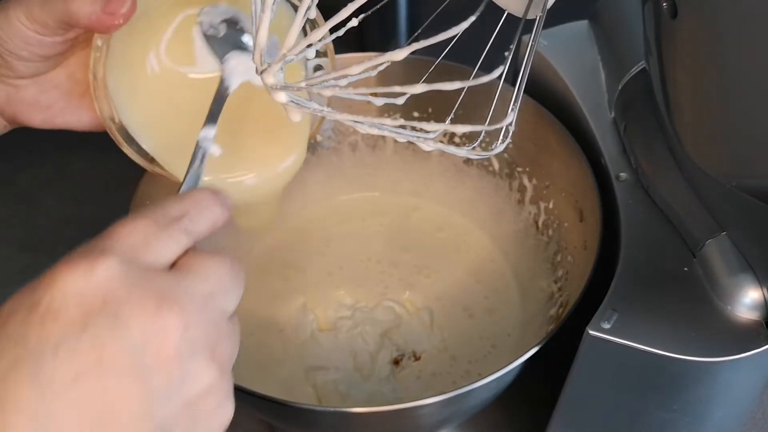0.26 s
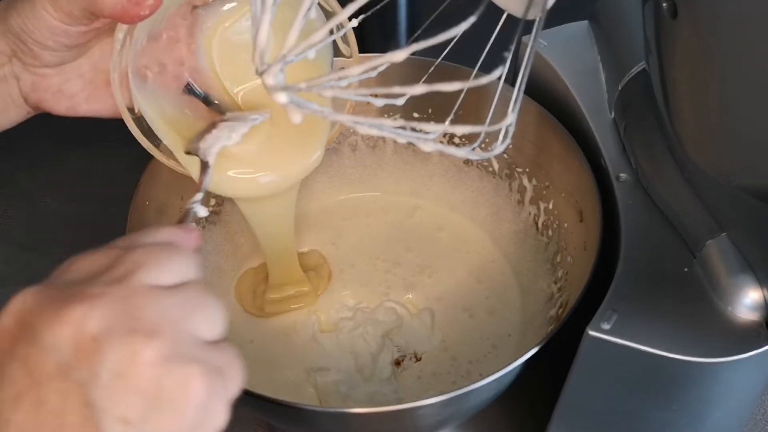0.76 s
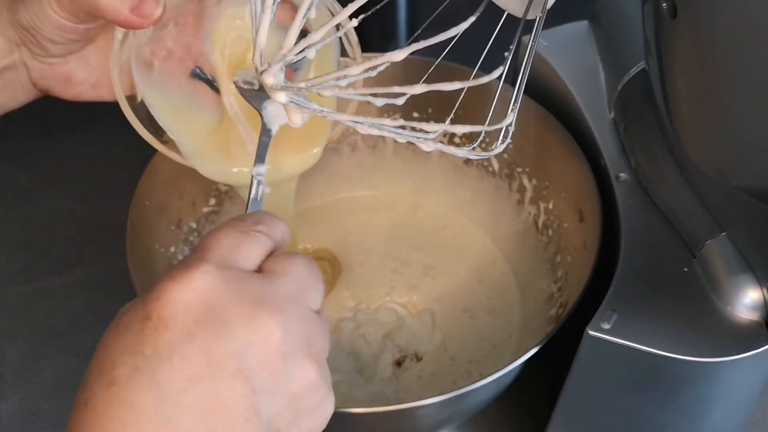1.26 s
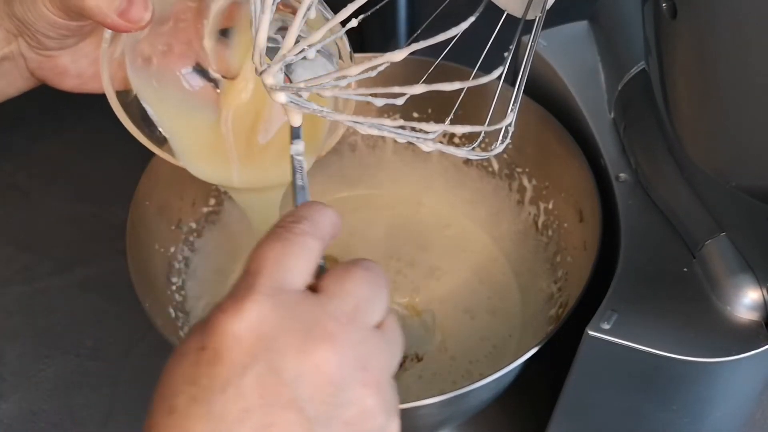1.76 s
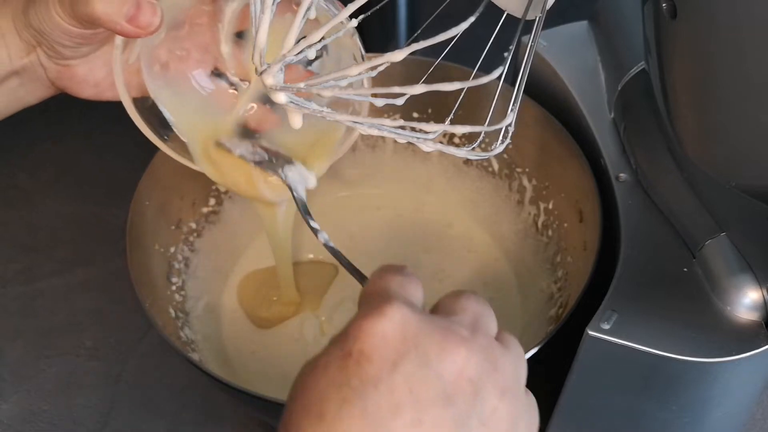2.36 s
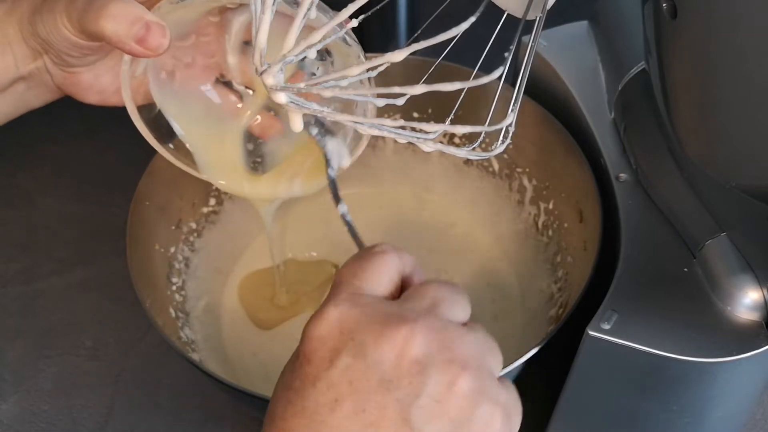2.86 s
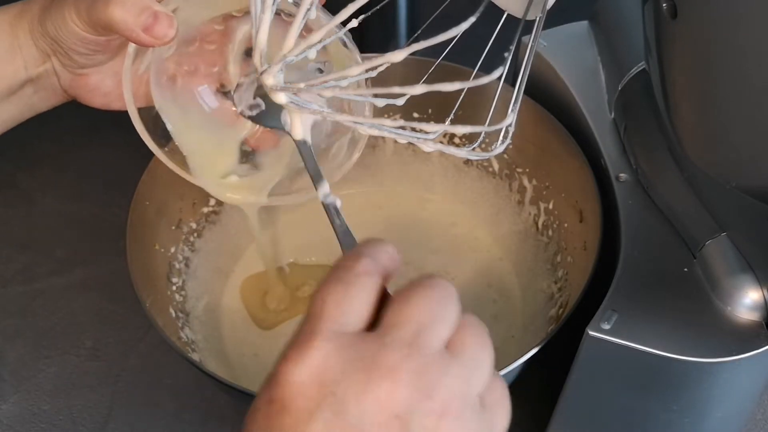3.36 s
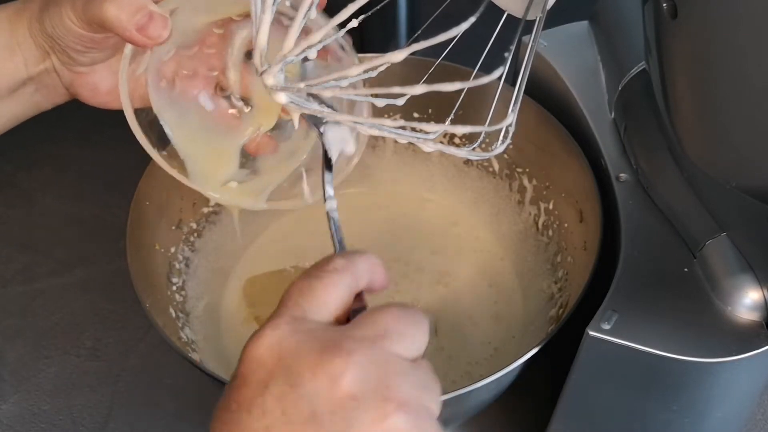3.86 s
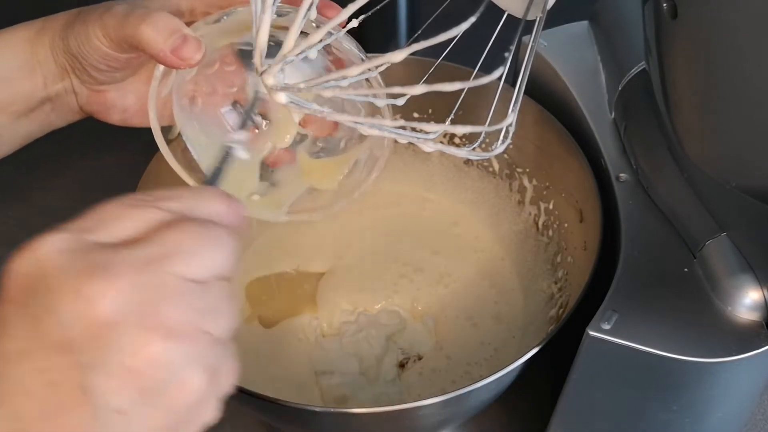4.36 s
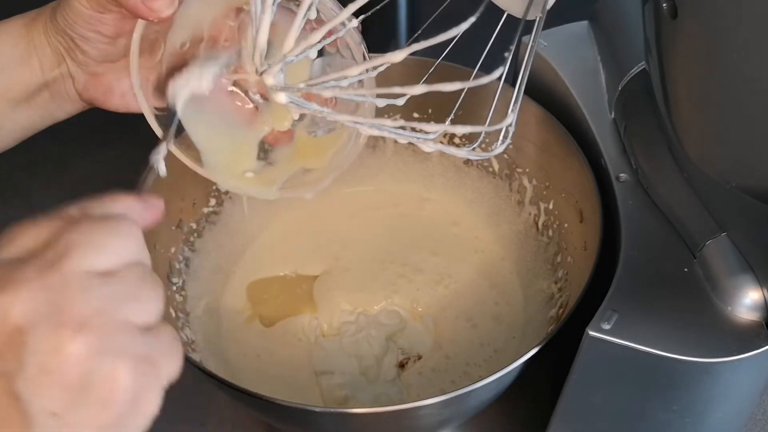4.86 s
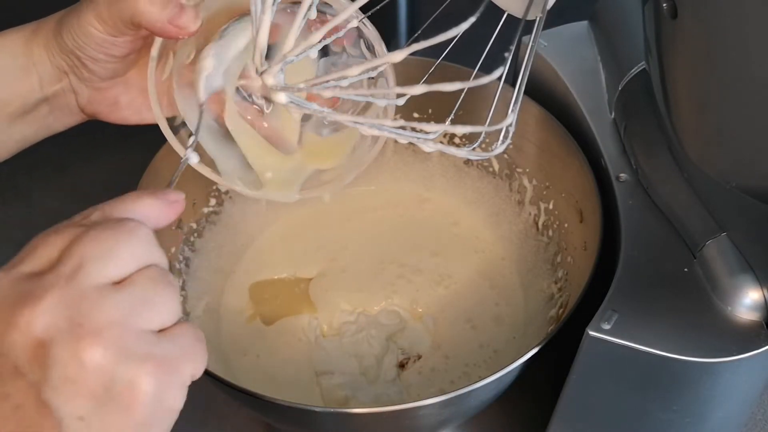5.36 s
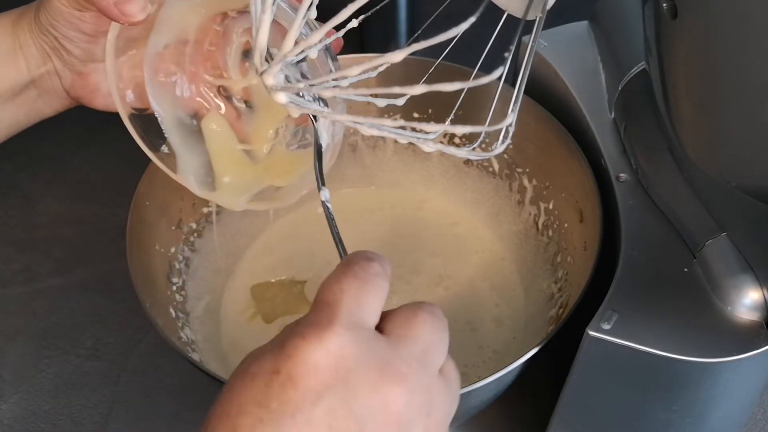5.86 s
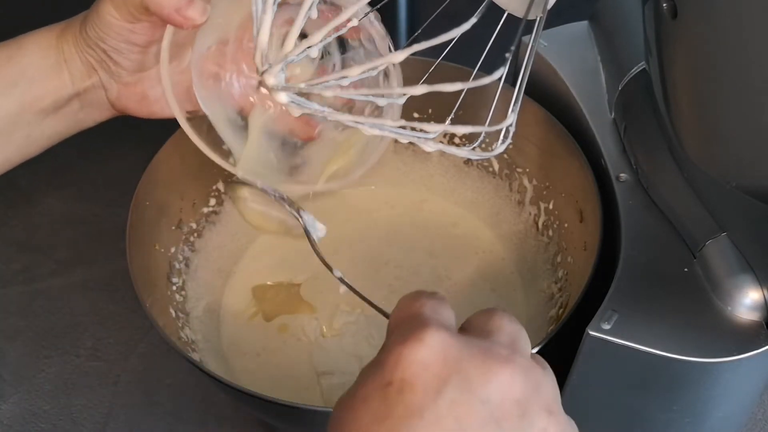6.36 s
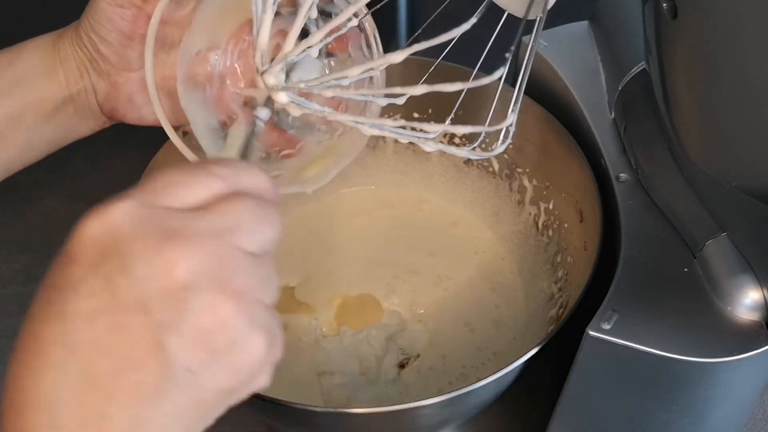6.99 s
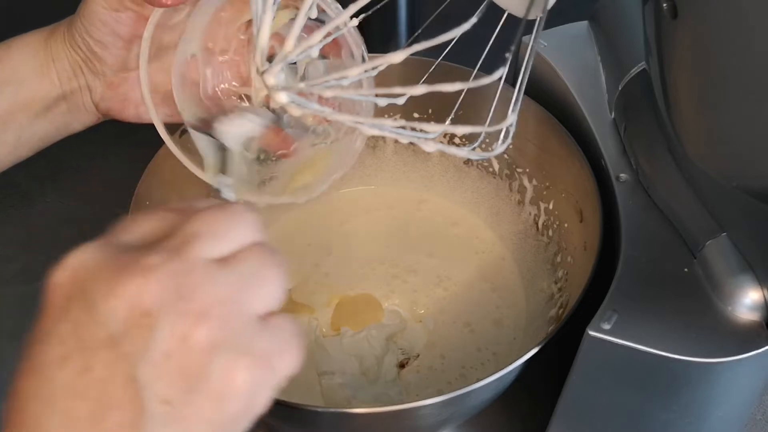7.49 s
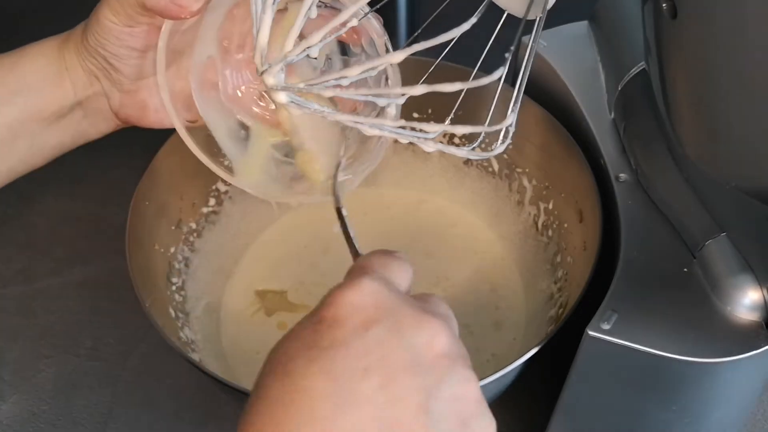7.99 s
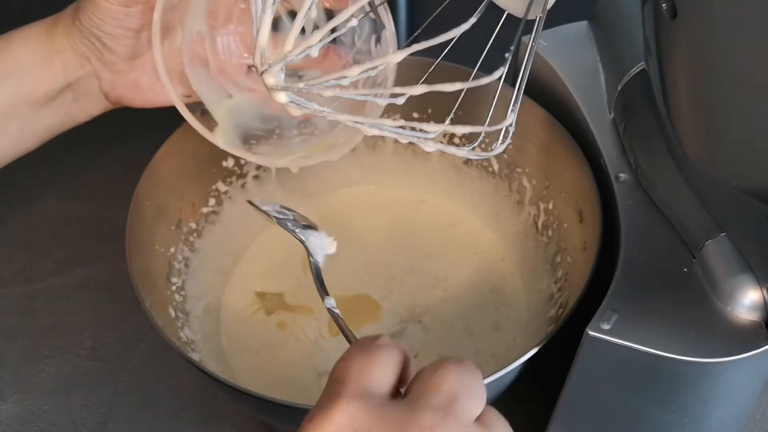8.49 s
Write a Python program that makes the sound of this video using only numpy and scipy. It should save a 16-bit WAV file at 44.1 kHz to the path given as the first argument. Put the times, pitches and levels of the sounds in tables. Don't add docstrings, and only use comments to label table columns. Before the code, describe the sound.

Steel fork strokes scrape thick syrup from a glass bowl, each landing with a bright short clink, with quiet appliance hum behind.

```python
import sys
import numpy as np
from scipy import signal
from scipy.fft import rfft, irfft, next_fast_len
from scipy.io import wavfile
from scipy.ndimage import uniform_filter1d, map_coordinates

SR = 44100
rng = np.random.default_rng(int(sys.argv[2]) if len(sys.argv) > 2 else 0)


def dump_mix(stems):
    frames = np.atleast_2d(stems).T
    limited = np.clip(frames, -1, 1)
    pcm = np.round(limited * 32767).astype(np.int16)
    wavfile.write(sys.argv[1], SR, pcm)


def undo_db(level):
    steps = np.asarray(level, float) / 20
    return 10 ** steps


N = 385196


def unit(x):
    return x / np.sqrt(np.mean(x ** 2) + 1e-20)


def along(points, hz):
    f, v = np.transpose(points)
    return np.interp(np.log(hz + 1), np.log(f + 1), v)


def curves(rows):
    s, *cols = np.transpose(rows)
    return [np.interp(np.arange(N) / SR, s, c, left=-150, right=-150) for c in cols]


def filtered(x, response):
    m = next_fast_len(x.shape[-1] + 8192)
    spectrum = rfft(x, m) * response(np.fft.rfftfreq(m, 1 / SR))
    return irfft(spectrum, m)[..., :x.shape[-1]]


def ring(modes, t, scatter_db):
    hz, t60, db = np.transpose(modes)[:, :, None]
    chance = rng.standard_normal((2, len(modes), 2))
    phase = 0.75 * chance[..., :1] * hz / 3000
    level = undo_db(db + scatter_db * chance[..., 1:] - 60 * t / t60)
    rise = 1 - np.exp(-t / 0.00041)
    return rise * np.sum(level * np.sin(2 * np.pi * hz * t + phase), 1)


def decays(peaks, spread):
    return [(hz * (1 + spread * rng.standard_normal()), np.log(1000) / np.pi / width, db)
            for hz, width, db in peaks]


# frequency in Hz, level in dB per Hz.
AIR = [(20, 0.5), (45, -10.5), (101, -14.5), (146, -18.5), (200, -21.5), (300, -28), (420, -26), (600, -31),
       (800, -29.5), (1200, -31.5), (1900, -30), (4200, -38.5), (10000, -45.5), (16000, -47.5)]
# frequency in Hz, left-right likeness (1 is the same).
ALIKE = [(60, 1), (180, 0.88), (350, -0.14), (600, -0.58), (2000, 0.066), (15000, 0.2)]
# frequency in Hz, wander in Hz, peak in dB.
HUM = [(60, .7, 2), (80, .8, 1), (98.9, .2, 2), (197.8, .4, -12)]
# time in seconds, rumble in dB, motor in dB.
LOAD = [(0, -76, -69.5), (2.5, -70.5, -69.5), (2.87, -66.5, -74), (3.33, -70.5, -64), (3.77, -69.5, -75.5),
        (4.33, -64.5, -69.5), (5.2, -62, -70.5), (5.9, -66.5, -70.5), (7.73, -66.5, -69.5),
        (8.74, -76, -72)]
# time in seconds, firing pitch in Hz, level in dB.
ENGINE = [(0, 123.7, -94), (4, 127.8, -80.5), (6, 134.6, -69), (7.7, 141, -70), (8.74, 143.1, -76)]


def background():
    def floor(hz):
        turn = np.arccos(np.clip(along(ALIKE, hz), -1, 1)) / 2
        colour = undo_db(along(AIR, hz)) * (hz < 15750)
        return colour * [np.cos(turn), np.sin(turn)]

    def wander():
        return unit(filtered(rng.standard_normal(N), lambda hz: 1 / (1 + (hz / 4) ** 2)))

    def turns(hz, drift_hz):
        return 2 * np.pi * np.cumsum(hz + drift_hz * wander()) / SR

    mid, side = filtered(rng.standard_normal((2, N)), floor)
    air = undo_db(-61.5) * unit(np.array([mid + side, mid - side]))
    low, idle, motor, octave = [undo_db(db + 3.3 * wander()) * np.sin(turns(hz, drift_hz))
                                for hz, drift_hz, db in HUM]
    rumble_db, motor_db = curves(LOAD)
    engine_hz, engine_db = curves(ENGINE)
    crank = turns(engine_hz, drift_hz=1.7)
    firing = 1.2 * np.sin(crank) + undo_db(-12) * np.sin(2 * crank)
    engine = undo_db(3.0 * wander()) * firing + idle
    return air + undo_db(rumble_db) * low + undo_db(motor_db) * (motor + octave) + undo_db(engine_db) * engine


# frequency in Hz, t60 in seconds.
KITCHEN = [(300, 0.72), (1200, 0.53), (2500, 0.61), (5000, 0.56), (10000, 0.31), (15000, 0.54)]


def kitchen(x):
    out, step = np.zeros((2, N + 2 * SR)), SR // 3
    for start in range(0, N, step):
        hz, t, z = signal.stft(rng.standard_normal((2, SR * 3 // 4)), SR, nperseg=256)
        fade = undo_db(-60 * t / along(KITCHEN, hz)[:, None])
        tail = signal.istft(z * fade, SR, nperseg=256)[1]
        tail *= 1 - np.exp(-np.arange(tail.shape[1]) / SR / 0.0021)
        wet = signal.fftconvolve(x[:, start:start + step], tail / np.linalg.norm(tail[0]), axes=1)
        out[:, start:][:, :wet.shape[1]] += wet
    return out[:, :N]


# frequency in Hz, width in Hz, level in dB.
THUD = [(321.5, 24, -3.5), (410, 120, 6.5), (822, 47, -2.5)]
# time in seconds, level in dB.
BUMPS = [(1.879, -61.5), (4.498, -69), (5.94, -61), (6.088, -61), (7.69, -59)]


def bumps():
    out, t = np.zeros((2, N + SR)), np.arange(SR // 12) / SR
    for s, db in BUMPS:
        knock = ring(decays(THUD, spread=.05), t, scatter_db=0.5)
        out[:, round(s * SR):][:, :len(t)] += undo_db(db + 6.5) * knock
    return out[:, :N]


# time in seconds, level in dB, rise in seconds.
RIM = [(6.296, -42, 0.0019), (6.307, -45, .003), (8.263, -39, 0.0019), (8.285, -32.5, .002)]
# frequency in Hz, t60 in seconds, dB.
RIM_MODES = [(1252, 0.079, 1), (1187, .045, -4), (683, 0.051, -11), (2060, 0.086, -12)]


def rim():
    out, t = np.zeros((2, N + SR)), np.arange(SR // 5) / SR
    for s, db, rise in RIM:
        swell = (1 - np.exp(-t / rise)) ** 2
        out[:, round(s * SR):][:, :len(t)] += undo_db(db + 4.5) * swell * ring(RIM_MODES, t, scatter_db=3)
    return out[:, :N]


# time in seconds, first mode in dB, first mode in Hz,
# second mode over first in dB, second mode in Hz.
LANDINGS = [(0.2921, -35.5, 1543, -14, 2350), (.9397, -33, 1330, -6, 1960), (1.3875, -29.5, 1236, -3, 2020),
            (1.7514, -30, 1395, -2, 2185), (2.5415, -55.5, 1870, 6.5, 2340), (2.6373, -33.5, 1320, 2, 2340),
            (3.495, -36.5, 1307, -2, 2390), (4.2185, -33.5, 1417, 1.5, 2330), (4.6538, -31, 1407, -3, 2260),
            (5.3262, -28, 1317, 5, 2464), (5.829, -44.5, 1314, -9, 2160), (5.9285, -42, 1000, -5, 2336),
            (6.9084, -35.5, 1418, 9.5, 2437), (7.207, -28.5, 1438, -9, 2340),
            (7.6525, -37, 1456, -0.97, 1915), (7.7638, -23, 1320, -2, 2466)]
# neck in dB, neck in Hz, tines in dB, tines in Hz.
STEEL_RING = [(-40.5, 5400, -31.5, 13000), (-37, 5230, -34, 7800), (-35.5, 5080, -34, 7100),
              (-39.5, 5120, -32.5, 8800), (-47.5, 5600, -30, 9080), (-45.5, 6300, -42.5, 12000),
              (-49, 6040, -45.5, 6200), (-36.5, 4970, -25.5, 8000), (-32, 5700, -23.5, 12000),
              (-34.5, 4750, -25, 8880), (-58, 4400, -64, 6700), (-44.5, 5540, -43.5, 7100),
              (-28, 4850, -24, 11000), (-29, 5350, -22.5, 6960), (-34, 4900, -26, 5700),
              (-30.5, 3900, -26.5, 6680)]
# third mode over first in dB, third mode in Hz,
# thud under first in dB, rubbed upper modes over first in dB.
GRIP = [(-11, 3830, -20.5, -4), (-8, 3020, -15, 4.5), (-14, 3310, -12.5, 5.5), (-6.5, 3550, -17.5, 6.5),
        (-2, 4080, -18, 3.5), (-11.5, 3930, -19.5, -12), (-18, 3500, -19, -21), (-10.5, 4000, -16.5, -7.5),
        (-2.5, 3510, -18, -2), (-6, 3860, -15.5, 11.5), (-8.5, 2930, -25.5, -4), (-9.5, 2840, -22.5, 2),
        (3, 2800, -12.5, 2), (-6.5, 3630, -18.5, 1.5), (-13, 3000, -30, -2.5), (-14.5, 4040, -24, .1)]
# time in seconds, first mode in dB, first mode in Hz,
# second mode in Hz, fork over glass in dB.
TICKS = [(.643, -65.5, 1430, 2380, 12.5), (.69, -56.5, 1420, 1950, -0.5), (1.0546, -50, 1420, 2980, 4.5),
         (1.8742, -46, 1420, 2130, -13), (1.9974, -62, 1360, 2280, -9), (3.0, -68, 1060, 2430, -16),
         (3.6789, -49.5, 1114, 2330, 1.5), (3.7201, -50.5, 1280, 2310, -10), (3.882, -58, 1260, 2250, -12),
         (4.4977, -58.5, 1430, 2410, 4), (6.0891, -66, 950, 2340, 9.5), (6.2955, -48.5, 1210, 1860, 5),
         (6.297, -51.5, 1260, 1980, 2.5), (8.2642, -55, 1163, 2290, 9), (8.2882, -52, 1270, 2050, 4)]


def contacts():
    touches = []
    for (s, db, hz, over_db, hz2), fork, grip in zip(LANDINGS, STEEL_RING, GRIP):
        third_db, hz3, thud_db, _ = grip
        touches.append((s, db, hz, db + over_db, hz2, *fork, db + third_db, hz3, db + thud_db))
    for s, db, hz, hz2, fork_db in TICKS:
        tines_db = db + fork_db
        fork = (tines_db - 5.5, 5350, tines_db, 8000)
        touches.append((s, db, hz, db - 7.5, hz2, *fork, db - 13.5, 1.6 * hz2, db - 22))
    return sorted(touches)


# length in seconds, force at start in dB, force at end in dB,
# bare steel over glass in dB, time to fade 20 dB in seconds (signs of times are ignored).
DRAGS = [(.07, -52.5, -63.5, -1.5, 0.17), (.07, -55, -62.5, -7.5, 0.36), (0.15, -57, -54, -4, 0.0348),
         (0.048, -49.5, -51, -8.5, 0.1566), (0.1, -58, -73, -11, 0.06), (0.12, -66, -58, -2.5, 0.2),
         (0.026, -54, -62.5, -14, 0.27), (0.032, -52.5, -52.5, -2, 0.0852), (.2, -50.5, -59, -5, 0.12),
         (0.15, -59.5, -52.5, 4.5, .1), (0.019, -59, -93, -28, -1), (0.026, -58, -70, -7.5, -0.1),
         (0.15, -54.5, -47.5, -0.5, 0.03), (.16, -45, -52.5, -3.5, 0.11), (.1, -49, -59.5, 8, 0.01),
         (0.12, -56, -56, -1, 0.07)]
# peak in seconds, time to swell 20 dB in seconds, force in dB,
# bare steel over glass in dB, time to fade 20 dB in seconds.
RUBS = [(0.681, 0.2, -60.5, -4.5, 0.08), (1.06, 0.04, -49, -6, 0.06), (1.993, 0.12, -66.5, 1.5, 0.06),
        (2.284, 0.6, -73.5, -4.5, -0.3), (3.068, 0.05, -54.5, -2.5, 0), (3.669, -0.04, -63.5, 4, 0.05),
        (3.801, 0.06, -63, 2, 0.06), (3.891, 0.06, -59, 3, 0.02), (3.954, -0.02, -63, 1, -0.07),
        (4.498, 0.18, -62, 0.4, -0.33), (5.079, 0.24, -74, 0.4, 0.23), (5.92, 0.16, -62, -2, -0.2),
        (6.093, 0.09, -67, 1, 0.22), (6.304, 0.0349, -47, 1, 0.02), (8.266, 0.12, -63, -3.5, -0.08),
        (8.294, 0.09, -52, 2, -0.1)]


def strokes():
    moves = []
    for (s, *_), (hold, db, end_db, bare_db, fade), grip in zip(LANDINGS, DRAGS, GRIP):
        start = s + 0.0053
        end = start + abs(hold)
        moves.append(([start, end, end + 2 * abs(fade)], [db, end_db, end_db - 40], grip[3], bare_db))
    for s, swell, db, bare_db, fade in RUBS:
        times = [s - 2 * abs(swell), s, s + 2 * abs(fade)]
        moves.append((times, [db - 40, db, db - 40], -3.5 + .3 * bare_db, bare_db))
    out = np.zeros((3, N))
    for times, levels_db, upper_db, bare_db in moves:
        span = np.arange(round(times[0] * SR), min(round(times[-1] * SR), N))
        force = undo_db(np.interp(span / SR, times, levels_db))
        out[:, span] += force * undo_db([[0], [upper_db], [bare_db]])
    return uniform_filter1d(out, size=300)


def friction():
    catch_hz = 90
    knots = rng.standard_normal((3, int(N * catch_hz / SR) + 4))
    catches = undo_db([2.5 * map_coordinates(row, [np.arange(N) * catch_hz / SR]) for row in knots])
    slips = undo_db(2.5 * rng.exponential(size=N))
    shared, own = rng.standard_normal((3, N)), rng.standard_normal((2, 3, N))
    return strokes() * unit(catches * slips * (shared + 0.58 * own))


def crowd(named, count):
    chance = rng.random((count, 2))
    hz = 2550 + 11800 * (np.arange(count) + chance[:, 0]) / count
    db = along(sorted((f, level) for f, _, level in named), hz) - 5.5 - 7 * chance[:, 1]
    nearest = np.min(np.abs(np.log(hz[:, None] / np.transpose(named)[0])), axis=1)
    db -= 10 * np.exp(-(nearest / .07) ** 2)
    return np.transpose([hz, 0.025 * (3000 / hz) ** 0.49, db])


def struck_modes(contact):
    _, db1, hz1, db2, hz2, neck_db, neck_hz, tines_db, tines_hz, db3, hz3, _ = contact
    t60 = .021
    named = [(hz1, t60, db1 + 6), (hz2, 1.25 * t60, db2 + 8.5), (hz3, .014, db3 + 17.5),
             (neck_hz, .009, neck_db + 9.0), (tines_hz, .007, tines_db + 2)]
    beside = [(hz2, .018, db2 - 0.5), (.6 * hz1, .02, db1 - 10.5),
              (1.13 * hz1, .016, db1 - 4.5), (.88 * hz1, .014, db1 - 8)]
    return np.vstack([named, beside, crowd(named, count=21)])


# frequency in Hz, level in dB per Hz.
GRIT = [(150, -42), (250, -13.5), (629, -25), (1400, -7.5), (1760, -17), (2400, 2), (3230, -9.5),
        (4990, -18), (9330, -11.5), (14400, -43.5), (16000, -49.5)]


def fork_on_glass():
    out, t, force = np.zeros((2, N + SR)), np.arange(SR // 12) / SR, friction()
    touches = contacts()
    edges = [max(round((touch[0] - .05) * SR), 0) for touch in touches] + [N]
    for k, touch in enumerate(touches):
        s, tines_db, thud_db = touch[0], touch[7], touch[-1]
        modes = struck_modes(touch)
        blow = ring(modes, t, scatter_db=1)
        blow += undo_db(thud_db + 6.5) * ring(decays(THUD, spread=0.039), t, scatter_db=2.0)
        blow += undo_db(tines_db + 5.0 - 60 * t / 0.0042) * rng.standard_normal((2, len(t)))
        out[:, round(s * SR):][:, :len(t)] += blow
        group = np.digitize(modes[:, 0], [1750, 4400])
        for g, push in enumerate(force[..., edges[k]:edges[k + 1]].swapaxes(0, 1)):
            body = ring(modes[group == g] * [1, .85, .75], t[:2000], scatter_db=1.5)
            sung = signal.fftconvolve(push, body / np.linalg.norm(body[0]), axes=1)
            out[:, edges[k]:][:, :sung.shape[1]] += undo_db(-4) * sung
    grit = filtered(force[:, 2], lambda hz: undo_db(along(GRIT, hz) + 13.5))
    return out[:, :N] + undo_db(-2.5) * grit


# frequency in Hz, level in dB.
PATH = [(150, -9), (400, -4.5), (580, -12), (850, 2.5), (3900, 2), (4400, -0.5), (5000, 6), (9500, 2.5),
        (11000, -15), (14500, -18), (16000, -36)]
# frequency in Hz, left over right in dB.
LEAN = [(200, 0.5), (700, 1.2), (1300, -3.5), (2400, 2.5), (4500, -3), (9000, -1), (14000, -4.5)]


def scene():
    def path(hz):
        return undo_db(along(PATH, hz) + along(LEAN, hz) * [[.5], [-.5]])

    scrapes, flicks = filtered(np.array([fork_on_glass() + bumps(), rim()]), path)
    bowl = scrapes + flicks + undo_db(-7) * kitchen(scrapes + undo_db(-5.0) * flicks)
    bowl[1] = np.roll(bowl[1], 5)
    return bowl + background()


def low_pass(x):
    return signal.sosfilt(signal.butter(12, 16540, fs=SR, output="sos"), x)


def record(dry):
    return low_pass(dry)


dry = scene()
out = record(dry)
dump_mix(out)
```